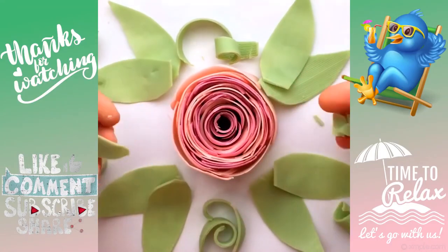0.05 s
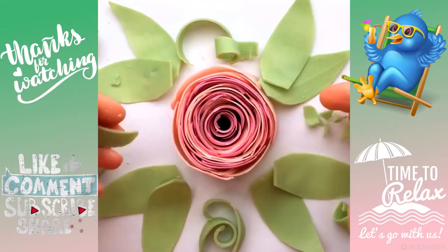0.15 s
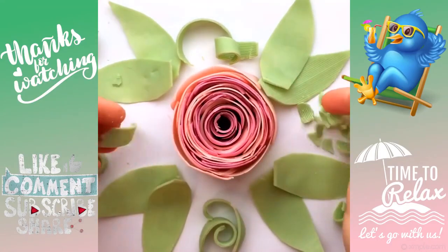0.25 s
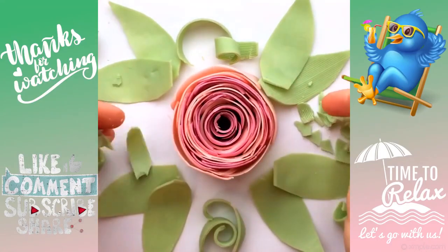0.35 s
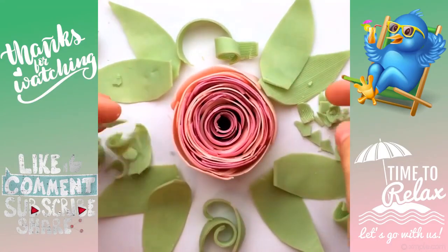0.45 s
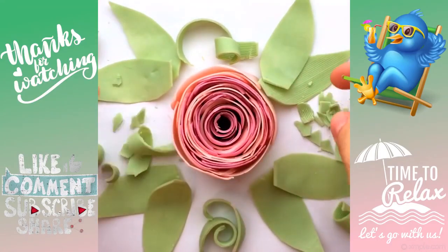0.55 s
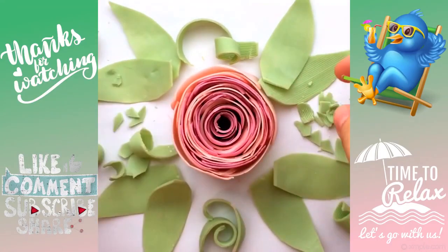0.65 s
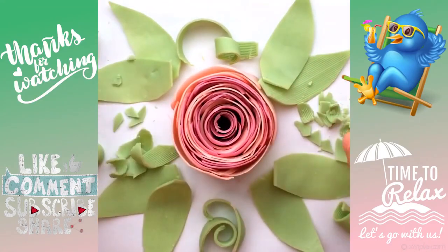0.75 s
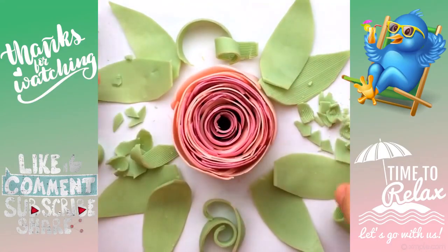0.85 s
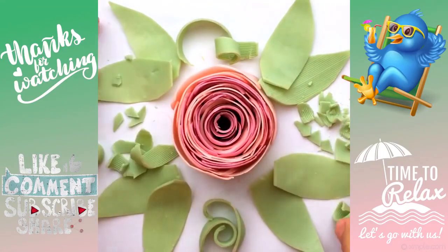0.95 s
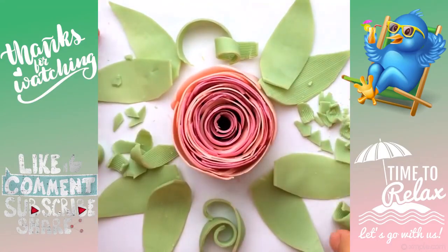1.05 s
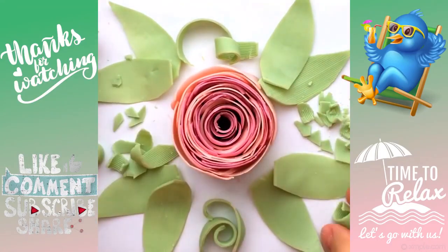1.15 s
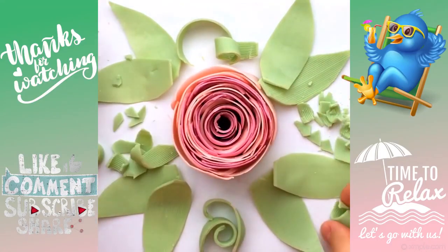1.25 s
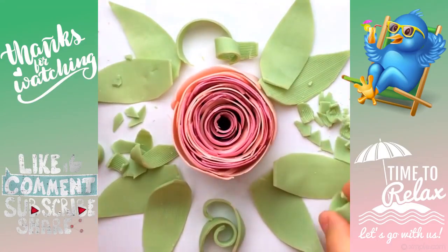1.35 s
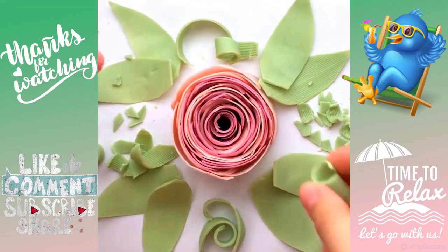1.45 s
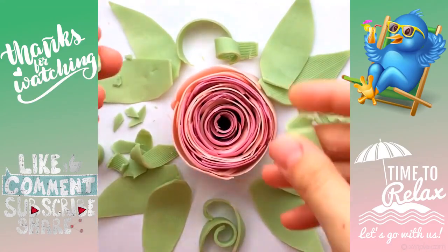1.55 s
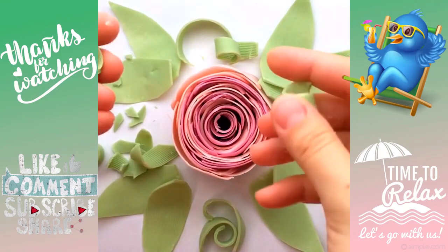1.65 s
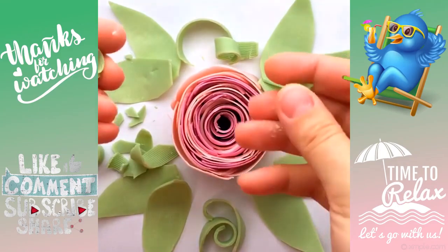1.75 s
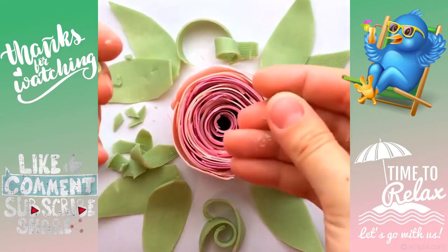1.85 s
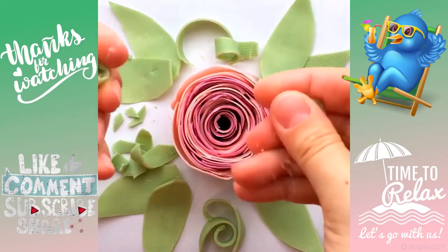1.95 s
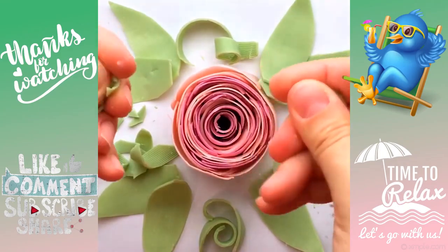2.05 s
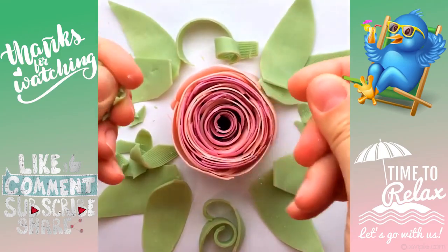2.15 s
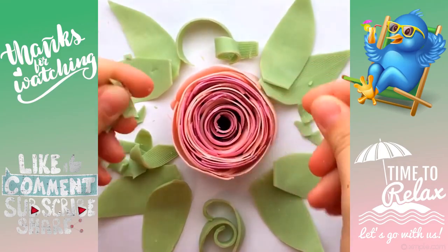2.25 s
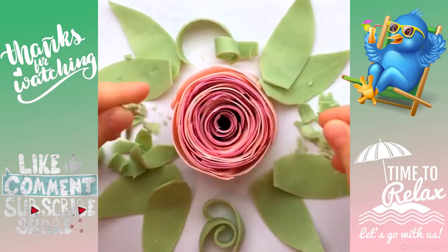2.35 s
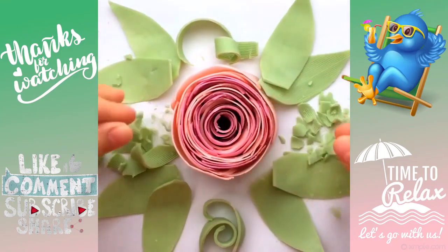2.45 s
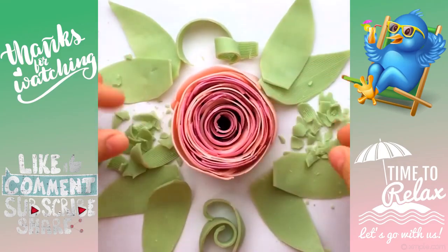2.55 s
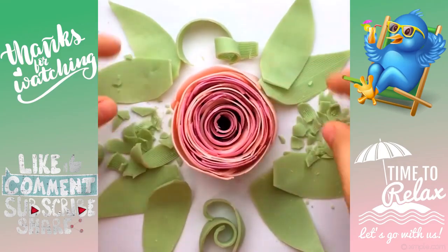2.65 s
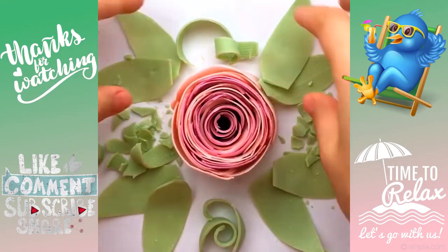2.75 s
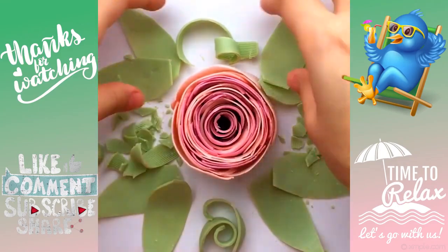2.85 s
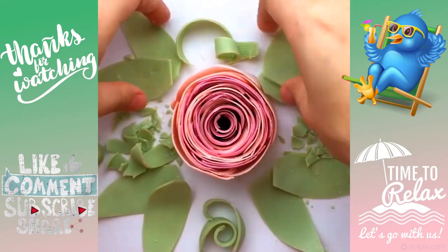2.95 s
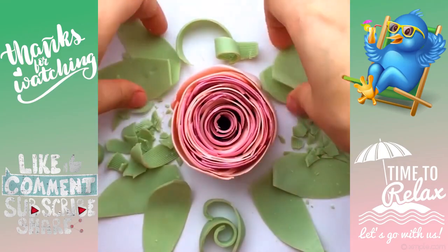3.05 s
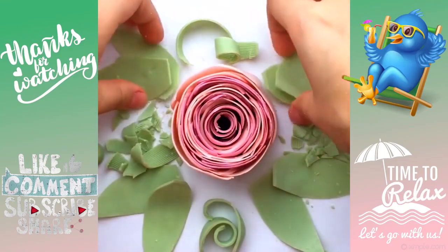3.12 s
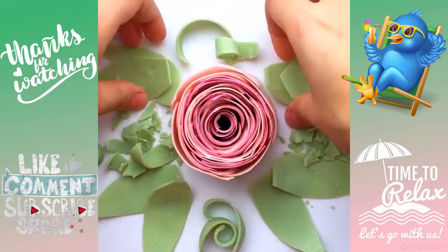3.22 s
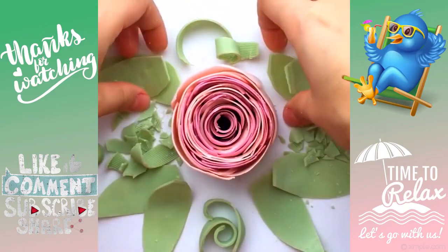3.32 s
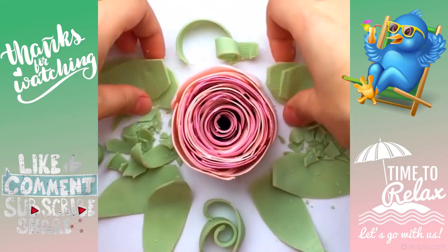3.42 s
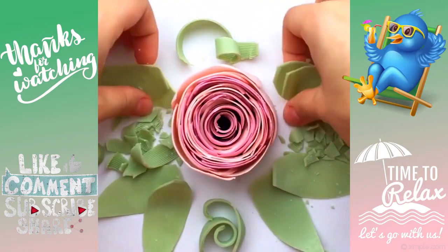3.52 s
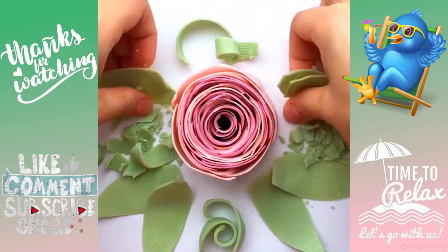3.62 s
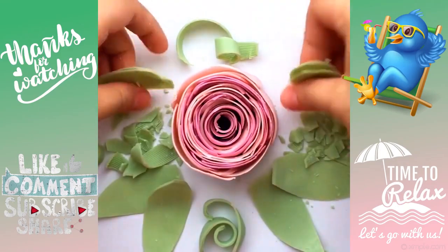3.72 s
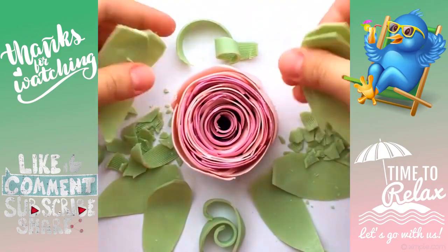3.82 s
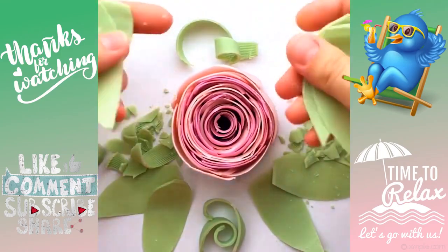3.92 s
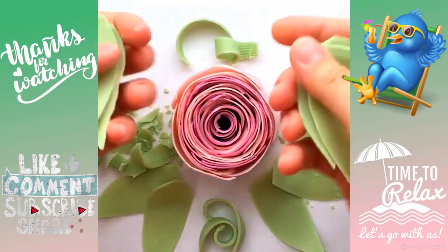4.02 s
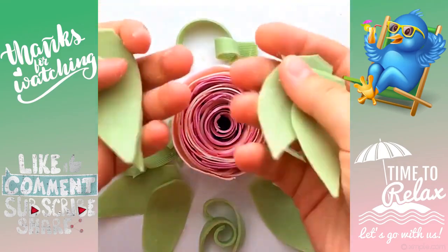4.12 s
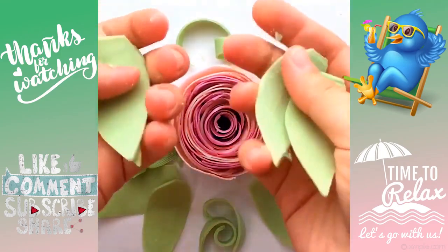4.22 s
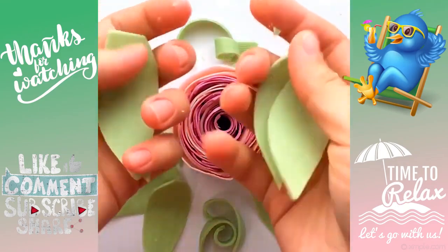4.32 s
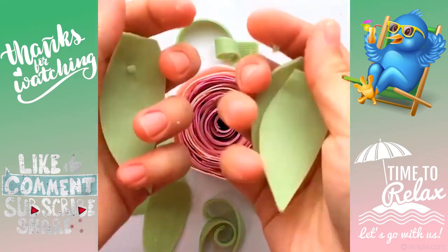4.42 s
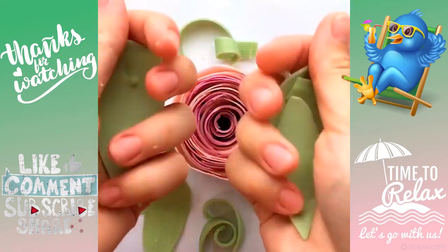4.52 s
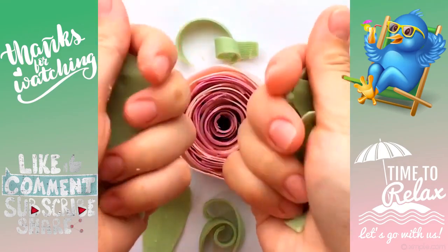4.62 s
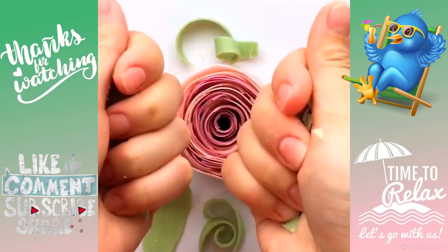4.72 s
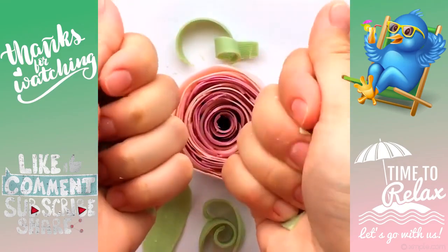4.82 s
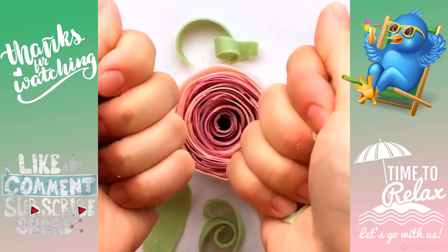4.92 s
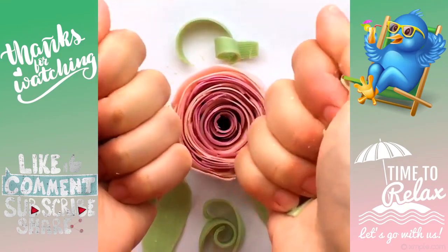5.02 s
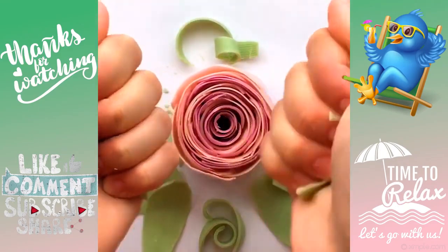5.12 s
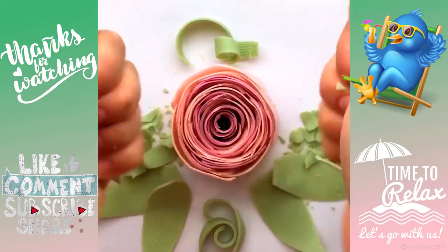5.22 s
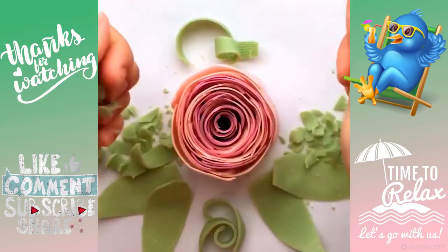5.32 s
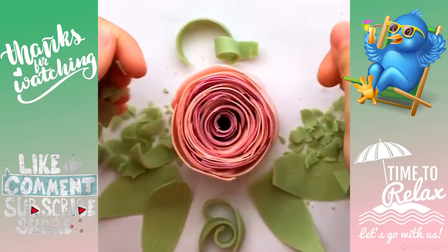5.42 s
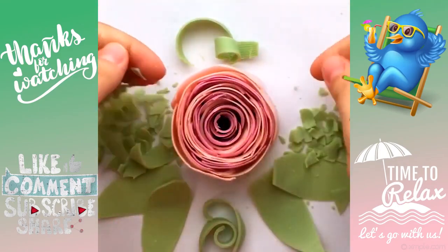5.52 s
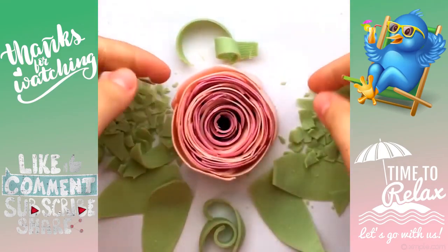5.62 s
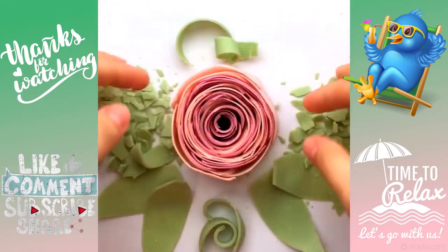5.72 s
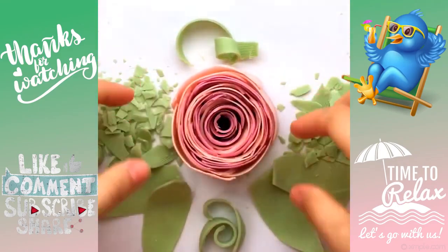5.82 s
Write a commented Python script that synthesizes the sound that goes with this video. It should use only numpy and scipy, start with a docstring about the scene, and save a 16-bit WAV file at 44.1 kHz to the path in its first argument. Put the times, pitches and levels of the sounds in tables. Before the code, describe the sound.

Close to the microphone in a small quiet room, dried clay leaves are broken by hand. Faint rustle and small ticks come first, crumbs tap onto a covered table, a sharp cluster of snaps follows near two seconds, pieces drop, soft thuds and sliding accompany gathering, then both fists crush leaves in a dense crunch before crumbs spill.

```python
"""A faint rustle and a few small cracks come first, then light taps: thin leaves of dried craft clay are
snapped and later crushed in two fists, close to a microphone in a small room.
Each fracture is a noise burst that rings its shard for a few milliseconds; dense ticks and noise make the crumbs
that grind and patter between. Pieces fall on a covered table, whose damped swings and faint modes answer them.
Gliding bands of friction noise, reflections, a low room tone and faint far tones complete the scene."""
import sys
import numpy as np
from scipy import signal
from scipy.fft import rfft, irfft, next_fast_len
from scipy.io import wavfile
from scipy.ndimage import map_coordinates

SR = 44100
rng = np.random.default_rng(int(sys.argv[2]) if len(sys.argv) > 2 else 0)


def persist_wave(psi):
    """Save psi, clipped to +-1, as 16-bit WAV."""
    counts = np.round(np.clip(psi, -1, 1) * 32767).astype(np.int16)
    wavfile.write(sys.argv[1], SR, np.atleast_2d(counts).T)


N = 258867

# Main fractures in the hands: start_s, level_db, decay_t60_s (2 ms at least), ring_hz, ring_boost_db,
# tilt_db_per_octave
CRACKS = [(.006, -44.5, 0.041, 2030, 23, -5.5), (.2411, -27, 0.019, 1200, -8, .5),
          (.2452, -31, 0.017, 10200, 13, -3), (.3198, -32.5, 0.008, 7500, 26, -2),
          (.3482, -30.5, .017, 7600, 15, 9), (2.0437, -16.5, 0.011, 9000, 7, 3),
          (2.0473, -15, 0.026, 2710, 13, 2.5), (2.058, -14.5, 0.022, 2750, 6, 3.5),
          (2.0639, -26.5, 0.0073, 5950, 20, -6.5), (2.1128, -35, 0.0073, 5300, 14, 0),
          (2.1654, -29, 0.005, 5100, 10, 1), (2.1783, -7.5, 0.0051, 4440, 7, 0.5),
          (2.1808, -9.5, 0.0066, 8600, 6, -1), (2.1886, -24, .025, 4800, 19, -6),
          (2.196, -25, .015, 11100, 10, -4), (2.2365, -19.5, 0.014, 10500, 15, -6),
          (2.2609, -33.5, 0.011, 4630, 20, -4.5), (2.293, -23.5, 0.014, 2310, 31, 11),
          (2.3101, -29.5, .007, 5900, 5.5, 2.5), (2.385, -32.5, .008, 10050, 27, 0),
          (4.1673, -44.5, 0.013, 7720, 11.5, -3), (4.2088, -46, .0085, 7400, 4, 5),
          (4.2924, -41, .015, 6750, 8, -1.5), (4.314, -30.5, .006, 3280, 19, 0),
          (4.3436, -38, 0.0054, 5370, 9, -6), (4.3518, -31, 0.0042, 3550, 17, 3.5),
          (4.3586, -31.5, 0.0062, 3390, 14, 3.5), (4.3667, -30, 0.008, 3300, 17, 2.5),
          (4.3891, -37, .02, 3220, 22, 3), (4.4774, -38, 0.097, 3240, 9, -4.5),
          (4.5928, -37, 0.0096, 5140, 23, -8.5), (4.68, -36.5, 0.013, 4660, 16, -8.5),
          (4.7047, -31, 0.0029, 3670, 22, -8), (4.7557, -14, 0.0062, 3700, 21, -3.5),
          (4.7605, -28, 0.017, 3240, 29, 4), (4.7649, -15, 0.0061, 3830, 29, -3),
          (4.772, -14, .01, 4140, 15, -5.5), (4.7881, -10.5, 0.0083, 3350, 25, -5.5),
          (4.8276, -17, 0.0026, 6110, 12, -3.5), (4.8316, -16.5, 0.0083, 4400, 13.5, -6.5),
          (4.8377, -23.5, 0.015, 6110, 6, -5.5), (4.8524, -14.5, 0.0017, 3700, 28, -10),
          (4.8575, -18, 0.032, 2230, 16, -8), (4.8694, -11, 0.0036, 3670, 12.5, -3.5),
          (4.8906, -14.5, .011, 3600, 29, -5.5), (4.9076, -22, .012, 4000, 8, 5),
          (4.9105, -9, 0.0076, 1750, 25, 1), (4.9152, -13, 0.026, 1930, 28, 0.5),
          (4.9194, -12, 0.01, 4540, 25, 3), (4.9238, -17.5, 0.016, 1720, 27, -1),
          (4.9345, -21, 0.011, 5900, 19, -4), (4.9375, -14, 0.021, 2470, 6, -2.5),
          (4.949, -26, 0.019, 1810, 6, -3.5), (4.9639, -35, .011, 3120, 24, -5),
          (4.976, -26.5, .032, 4500, 22, -8.5), (4.9812, -14, 0.0097, 4040, 19, 2),
          (4.9848, -19.5, .013, 2070, 19, -1), (5.0091, -25.5, 0.019, 1440, 13, -0.5),
          (5.0155, -19.5, 0.016, 1970, 12, 1.5), (5.0289, -23, 0.085, 1900, 10, -1),
          (5.0409, -19, 0.021, 1110, 22, 1), (5.0488, -23, 0.03, 1160, 26, 1.5),
          (5.0765, -17.5, .018, 2280, 17, -1.5), (5.0812, -18, 0.014, 1970, 2, -3),
          (5.0883, -11.5, 0.0091, 3850, 12.5, -1), (5.0974, -19.5, 0.0084, 1240, 13, -3),
          (5.1037, -28, 0.016, 5100, 12, -7), (5.1276, -26, .007, 7320, 21, -1.5),
          (5.1459, -20.5, 0.0082, 1280, 16, -2.5), (5.154, -25, .029, 1390, 19, -4),
          (5.1757, -28, .02, 1640, 31, -9), (5.1892, -20.5, 0.0086, 2190, 8, -2),
          (5.1928, -11.5, 0.007, 2050, 15.5, -2.5), (5.2014, -23.5, 0.024, 1600, 12, -2.5),
          (5.2111, -19.5, 0.0065, 11000, 21, -9.5), (5.2439, -25.5, .011, 2280, 17, 2.5),
          (5.2517, -27, 0.013, 1620, 26, -9), (5.2675, -21.5, 0.027, 2050, 28, -7.5),
          (5.2739, -26, 0.021, 2420, 26, 0), (5.3081, -22, 0.0085, 2170, 30, -3.5),
          (5.3443, -36.5, 0.011, 2480, 15, -3)]
# Main pieces striking the table: same columns as the fractures
TAPS = [(.368, -28, 0.014, 1870, 7.5, -3), (.4206, -31, 0.032, 1800, 1, -1.5),
        (.4355, -25, 0.0077, 1810, 10.5, -5.5), (.4694, -36, .017, 1260, 22, 4),
        (.5339, -34, 0.014, 2470, 2, -2), (.5656, -31, 0.013, 2240, 9, -6),
        (.5862, -30, 0.018, 5660, 13, -3.5), (.6662, -27, 0.0074, 2180, 10.5, -3.5),
        (.7287, -27, 0.0046, 11200, 22, 15), (.7414, -31, 0.05, 10800, 24, -7),
        (.7837, -37.5, 0.016, 11300, 21, -5.5), (.8558, -27.5, .012, 8700, 8.5, 5.5),
        (.8973, -27.5, 0.013, 1800, 5, 7.5), (.9286, -42, .009, 7000, 10, 4),
        (.9711, -34.5, 0.0037, 5400, 26, 7), (.9903, -38, .009, 6650, 8, 4.5),
        (1.0324, -27.5, .014, 11100, -4, 13), (1.0566, -29, 0.0099, 6900, 12.5, 8),
        (1.1291, -36.5, 0.0088, 7850, 11, 7), (2.5658, -31.5, 0.033, 9100, 4, 7),
        (2.6027, -26, 0.083, 3580, 30, 7), (2.6087, -22, 0.062, 10000, 21, 8),
        (2.6236, -24, 0.12, 1900, 13, 1.5), (2.6568, -25, 0.039, 6130, 27, -6),
        (2.6636, -26, 0.0096, 5300, 32, 1), (2.7029, -30.5, 0.055, 2320, 7, -6),
        (2.7781, -35, 0.0072, 9100, 8, 11), (2.8547, -41, .01, 11200, 17, 6),
        (2.9426, -30, 0.0048, 6300, 5, 8), (3.1491, -46.5, .014, 5060, 11, 2.5),
        (3.2176, -40, .01, 1200, 14, 2), (3.2359, -37.5, .01, 1870, 14.5, -3.5),
        (3.461, -44.5, 0.02, 2500, 10, -7), (3.4992, -38, 0.018, 3440, 7, 0),
        (3.6494, -36, .041, 1260, 10, 0.5), (3.9574, -46, .036, 4000, 24, 4.5),
        (5.561, -32, 0.033, 1720, 0, -3), (5.628, -32, 0.0048, 6170, 13, 5.5),
        (5.6577, -25.5, .017, 5430, 6.5, -5), (5.7709, -26, 0.038, 9300, 22, 0),
        (5.8034, -25, 0.021, 1190, 30.5, 7)]
# Dull blows on the table or into the palm: start_s, level_db, pitch_hz, decay_t60_s
THUMPS = [(.373, -22, 178, 0.029), (.44, -44, 197, .06), (0.516, -28.5, 182, 0.05), (0.568, -30, 199, 0.06),
          (0.689, -31.5, 195, 0.12), (1.422, -28.5, 141, .05), (1.453, -38, 69.4, 0.19),
          (2.179, -17.5, 296, 0.018), (2.238, -31.5, 424, 0.016), (2.624, -32, 193, 0.1),
          (3.2331, -12, 141, 0.049), (3.273, -23.5, 152, 0.083), (3.501, -27.5, 162, 0.098),
          (4.938, -20, 467, 0.016), (5.193, -21, 394, 0.01)]
# Colour of a fracture and of a landing: frequency_hz, gain_db
FRACTURE_COLOUR = [(60, -40), (250, -18.5), (520, -8.5), (800, -14.5), (1500, -6), (3000, -3), (9000, 2),
                   (14000, 0.5)]
LANDING_COLOUR = [(60, -10), (250, -7.5), (520, -9), (800, -12.5), (1500, -6), (3000, -2), (9000, -1),
                  (14000, -5.5)]
# Colour of coarse crumbs, fine dust, table rumble and room tone: frequency_hz, relative_gain_db
GRIT_COLOUR = [(100, -24), (350, 0.5), (600, 0), (850, 1), (1400, -1), (2000, 2.5), (2800, -4.5),
               (3600, -0.5), (5500, -17.5), (12000, -27.5)]
DUST_COLOUR = [(1000, -56), (3000, -30), (5000, -4), (7500, -3.5), (10000, -3.5), (13800, -3.5),
               (16000, -18)]
TABLE_COLOUR = [(25, -31), (60, -22.5), (110, -8.5), (145, -0.5), (175, 2.5), (215, -3.5), (320, -14.5),
                (500, -22.5), (650, -19), (900, -34.5), (3000, -48)]
ROOM_TONE_COLOUR = [(20, -20.5), (30, -12.5), (43, 4.5), (65, 3), (90, -6), (130, 3), (180, -1.5),
                    (260, -17.5), (450, -22.5), (1000, -28), (4000, -35), (14000, -41.5)]
# Reverberation of the room: frequency_hz, decay_t60_s
ROOM_DECAY = [(200, 0.36), (2000, 0.082), (12000, 0.062)]
# A leaf sliding over skin or table: centre_s, half_length_s, nominal_level_db, pitch_hz,
# glide_octaves_per_s, relative_bandwidth (ratio)
SLIDES = [(0.049, 0.19, -60, 2930, 0.51, 0.56), (1.306, 0.14, -66.5, 5410, 0.31, 0.091),
          (3.453, 0.34, -54.5, 7160, -0.037, 0.46), (3.6, 0.51, -64, 3605, -0.21, 0.19),
          (4.22, 0.11, -61.5, 7040, -1.1, 0.044), (4.39, 0.15, -58, 3300, -0.075, .16),
          (5.774, 0.21, -51, 4520, 0.066, 0.51)]
# Resonances of the table top: centre_hz, width_hz, gain_db
TABLE_MODES = [(162, 19, -11), (630, 14, 10), (1935, 47, -1), (2520, 40, 2)]
# Faint background tones: start_s, end_s, peak_db, pitch_hz
FAINT_TONES = [(0.782, 0.83, -59, 637), (0.876, 0.94, -66, 638), (1.038, 1.095, -65, 637)]

# Three kinds of crumb movement: start_s, hold_s, grit_db, dust_db, rumble_db (before the trims in crumbs())
# Their shapes: attack_s, sag_db_per_s, release_db_per_s
# The fingers press until the clay gives way
SQUEEZES = [(2.045, 0.015, -42, -54, -53), (2.18, 0.047, -48, -50, -61), (2.24, .04, -57, -71, -70),
            (4.335, 0.043, -51.5, -46.5, -58), (4.76, 0.039, -36, -69, -65), (4.835, .13, -40, -68, -66),
            (5.02, 0.061, -41.5, -57, -70), (5.08, 0.077, -38, -44, -65), (5.17, 0.12, -45, -76, -57.5)]
SQUEEZE_SHAPE = (0.011, 23, 390)
# A handful of crumbs pours onto the table
SPILLS = [(.375, 0.043, -48.5, -49.5, -47), (.425, 0.063, -42, -51, -42.5), (.572, 0.033, -50, -58, -42),
          (.668, 0.012, -39.5, -52, -36.5), (.742, 0.031, -47.5, -58, -43.5), (2.604, .11, -46, -42, -45.5),
          (5.656, .1, -44.5, -42.5, -46), (5.765, 0.057, -44.5, -39.5, -43), (5.84, .04, -41.5, -34, -39.5)]
SPILL_SHAPE = (0.016, 14, 235)
# The fingers gather, turn or dust off pieces
HANDLINGS = [(0, 0.16, -64, -62, -59.5), (.28, 0.044, -60, -55.5, -55.5), (.8, .01, -82, -68, -49.5),
             (.96, 0.03, -66, -54, -58.5), (1.17, 0.13, -72, -61.5, -51.5), (1.28, 0.019, -65, -56, -50.5),
             (1.425, 0.0086, -62, -61, -45), (2.1, 0.51, -58, -59, -56.5), (2.76, 0.023, -69, -62, -54.5),
             (3.16, 0.072, -62, -68, -48), (3.24, 0.085, -58, -65, -41), (3.4, 0.27, -60, -59, -44.5),
             (3.76, .19, -60, -61.5, -59.5), (4.08, 0.074, -69, -65.5, -72),
             (4.2, 0.084, -61.5, -65, -68.5), (4.46, .03, -59, -62.5, -65), (4.6, 0.072, -64, -78, -73),
             (5.31, .32, -56.5, -61, -59)]
HANDLING_SHAPE = (0.093, 5.3, 139)

# Small chips: density, level over the crumbs, spread of levels, then decay, ring and range of pitches
CHIPS_PER_S, CHIP_DB, CHIP_SPREAD_DB = 70, 3.5, 3
CHIP_T60_S, CHIP_BOOST_DB, CHIP_TILT_DB = 0.011, 9, 0
CHIP_LOW_HZ, CHIP_HIGH_HZ = 1400, 7500
# Time constant of a blow's onset, in cycles of its swing, and level of its noise against the swing
THUMP_RISE_CYCLES, THUMP_PUFF_DB = 0.5, -10.5


def clicks(rows, colour, sharpness, tail_db, tail_t60, lead_db, size=2560):
    """Impulsive excitation of a resonator: micro-crack noise rings a shard and is trailed by debris."""
    lead_s = .005
    out = np.zeros(N)
    hz = np.fft.rfftfreq(size, 1 / SR) + 1
    t = np.arange(size) / SR - lead_s
    before, after = np.minimum(t, 0), np.maximum(t, 0)
    for start, level_db, t60, ring_hz, boost_db, tilt_db in rows:
        main_decay = amp(-60 * after / max(t60, .002))
        debris = amp(tail_db - 60 * after / tail_t60)
        # hairline cracks build up just before the piece gives way
        hairlines = (t < 0) * amp(lead_db + 60 * before / 0.01)
        envelope = (main_decay + debris) * (1 - np.exp(-after / 0.00018)) + hairlines
        # the crack front advances in jerks
        jerks = amp(3.2 * wobble(1100, size=size))
        burst = rng.standard_normal(size) * envelope * jerks
        detuning = hz / ring_hz - ring_hz / hz
        shard = 1 + (amp(boost_db) - 1) / (1 + 1j * sharpness * detuning)
        # small free shards are bright; a closed fist dulls them
        slope_db = tilt_db * np.log2(np.maximum(hz, 1100) / 4000)
        body = causal(amp(along(colour, hz) + slope_db))
        # palm or table a few centimetres away throws back a copy
        bounce = 1 + .55 * np.exp(-2j * np.pi * hz * rng.uniform(.0004, .0015))
        click = irfft(rfft(burst) * shard * bounce * body)
        # level_db is the rms of the click's energy spread over 2 ms
        click = click / np.linalg.norm(click) * np.sqrt(.002 * SR)
        add(out, start - lead_s, amp(level_db) * click)
    return out


def chips(flow):
    """Random small fractures: chip levels follow the stronger of grit and dust at each moment."""
    when, size, pitch = rng.random((int(CHIPS_PER_S * N / SR), 3)).T
    moving_db = np.maximum(flow[0], flow[1])[(when * N).astype(int)]
    levels_db = moving_db + CHIP_DB + CHIP_SPREAD_DB * np.minimum(-np.log(1 - size), 2)
    rings_hz = CHIP_LOW_HZ * (CHIP_HIGH_HZ / CHIP_LOW_HZ) ** pitch
    starts_s = when * N / SR
    return [(start, db, CHIP_T60_S, hz, CHIP_BOOST_DB, CHIP_TILT_DB)
            for start, db, hz in zip(starts_s, levels_db, rings_hz)]


def thumps():
    """Damped oscillation: a soft blow gives one low, quickly decaying swing and a dull puff of noise."""
    out = np.zeros(N)
    t = np.arange(SR // 4) / SR
    puffs = coloured(rng.standard_normal(N), TABLE_COLOUR)
    for start, level_db, hz, t60 in THUMPS:
        puff = puffs[int(start * SR):][:len(t)]
        swing = np.sin(2 * np.pi * hz * t)
        rise = 1 - np.exp(-t * hz / THUMP_RISE_CYCLES)
        envelope = amp(level_db - 60 * t / t60) * rise
        add(out, start, envelope * (swing + amp(THUMP_PUFF_DB) * puff))
    return out


def table_ring(x):
    """Modal resonance: what lands on the table leaves its modes ringing faintly."""
    def response(hz):
        return sum(amp(db) * 1j * hz * width / (centre ** 2 - hz ** 2 + 1j * hz * width)
                   for centre, width, db in TABLE_MODES)
    return filtered(x, response)


def stirred(rows, shape):
    """Energy addition: grit, dust and rumble powers rise, sag while a movement lasts, then die away."""
    attack_s, sag_db_per_s, release_db_per_s = shape
    t, power = np.arange(N) / SR, np.zeros((3, N))
    for start, hold, *levels_db in rows:
        age = t - start
        sag_db = sag_db_per_s * np.clip(age, 0, hold)
        release_db = release_db_per_s * np.maximum(age - hold, 0)
        # the linear rise is half done at the start time
        envelope = np.clip(.5 + age / attack_s, 0, 1) * amp(-(sag_db + release_db))
        power += np.outer(amp(levels_db), envelope) ** 2
    return power


def crumb_flow(rest_db=(-82, -77, -72)):
    """Incoherent summation: all movements add in power over a faint settling of crumbs, in dB."""
    power = stirred(SQUEEZES, SQUEEZE_SHAPE)
    power += stirred(SPILLS, SPILL_SHAPE)
    power += stirred(HANDLINGS, HANDLING_SHAPE)
    return 10 * np.log10(power + amp(rest_db)[:, None] ** 2)


def grains(rate, spread_db, t60, ring, size=256):
    """Granular excitation: a dense patter of decaying ticks of varied size, with any ring at random pitches."""
    count, t = int(rate * N / SR), np.arange(size) / SR
    when, strength, pitch = rng.random((count, 3)).T
    sizes = amp(spread_db * np.minimum(-np.log(1 - strength), 4))
    ring_hz = 1700 + 12000 * pitch[:, None]
    tone = np.sin(2 * np.pi * ring_hz * t)
    noise = rng.standard_normal((count, size))
    ticks = sizes[:, None] * (noise + ring * tone) * amp(-60 * t / t60)
    index = (when * N).astype(int)[:, None] + np.arange(size)
    return unit(np.bincount(index.ravel(), ticks.ravel(), N + size)[:N])


def crumbs(flow):
    """Granular friction and impact: coarse grit and fine dust scatter over a rumbling table top."""
    grit_db, dust_db, rumble_db = flow
    patter = grains(rate=1200, spread_db=5.2, t60=.007, ring=1.6) + amp(-5) * rng.standard_normal(N)
    # crumbs give way in clumps
    patter = patter * amp(2.1 * wobble(70, size=N))
    grit = amp(grit_db - 3.5) * coloured(patter, GRIT_COLOUR)
    dust = amp(dust_db + 1.0) * coloured(patter, DUST_COLOUR)
    knocks = grains(rate=300, spread_db=2, t60=0.0037, ring=0)
    rumble = amp(rumble_db - 2.0) * coloured(knocks, TABLE_COLOUR)
    return grit + dust + rumble


def slides(rough_db=3.5):
    """Dry friction: noise sings in a band of the leaf, which glides as the grip shifts."""
    out, t = np.zeros(N), np.arange(N) / SR
    for centre, half, level_db, hz, glide, width in SLIDES:
        stroke = np.cos(np.pi / 2 * np.clip((t - centre) / half, -1, 1))
        phase = 2 * np.pi * np.cumsum(hz * 2 ** (glide * (t - centre))) / SR
        # low-pass noise multiplied by a sine becomes a band around its pitch
        friction = unit(filtered(rng.standard_normal(N), lambda f: 1 / (1 + (f / (width * hz)) ** 2)))
        roughness = amp(level_db + rough_db * wobble(100, size=N))
        out += roughness * stroke * friction * np.sin(phase)
    return out


def near_echoes(x, db, count=7):
    """Early reflection: weak delayed copies return from surfaces within a metre or two."""
    delays_s = rng.uniform(.002, .012, count)
    return amp(db) * filtered(x, lambda hz: np.exp(-2j * np.pi * hz * delays_s[:, None]).sum(0))


def room(x):
    """Diffuse reverberation: a decaying noise response answers, dying sooner in the treble."""
    hz, t, noise = signal.stft(rng.standard_normal(SR // 3), SR, nperseg=256)
    decay = amp(-60 * t / along(ROOM_DECAY, hz)[:, None])
    tail = signal.istft(noise * decay, SR, nperseg=256)[1]
    # the first 5 ms are left silent
    response = np.pad(tail, (SR // 200, 0)) / np.linalg.norm(tail)
    return signal.fftconvolve(x, response)[:N]


def room_tone():
    """Stationary background noise: random pressure with a steady, mostly low spectrum."""
    return amp(-55.5) * coloured(rng.standard_normal(N), ROOM_TONE_COLOUR)


def faint_tones():
    """Pure tone: a thin steady sine fades in and out far behind the crackle."""
    t, out = np.arange(N) / SR, np.zeros(N)
    for start, end, peak_db, hz in FAINT_TONES:
        gate = np.clip(np.minimum(t - start, end - t) / .015, 0, 1)
        out += amp(peak_db) * gate * np.sin(2 * np.pi * hz * t)
    return out


def amp(db):
    """Decibel law: amplitude ratio of a level in dB."""
    return 10 ** (np.asarray(db) / 20)


def unit(x):
    """Normalisation: x scaled to rms 1."""
    return x / np.sqrt(np.mean(x ** 2) + 1e-20)


def along(points, hz):
    """Logarithmic pitch scale: (Hz, value) points interpolated on a log axis."""
    f, v = np.transpose(points)
    return np.interp(np.log(hz + 1), np.log(f + 1), v)


def filtered(x, response):
    """Linear filtering: the spectrum of x times a response of frequency."""
    m = next_fast_len(N + 8192)
    return irfft(rfft(x, m) * response(np.fft.rfftfreq(m, 1 / SR)), m)[:N]


def coloured(x, spectrum):
    """Spectral shaping: x filtered by the given gains in dB, at rms 1."""
    return unit(filtered(x, lambda hz: amp(along(spectrum, hz))))


def causal(gain):
    """Minimum phase: the response with this gain, found by folding its cepstrum onto positive time."""
    cepstrum = irfft(np.log(np.maximum(gain, 1e-6)))
    cepstrum[1:len(cepstrum) // 2] *= 2
    cepstrum[len(cepstrum) // 2 + 1:] = 0
    return np.exp(rfft(cepstrum))


def add(track, s, sound):
    """Superposition: mix a sound into the track at time s."""
    i = max(0, round(s * SR))
    track[i:i + len(sound)] += sound[:max(0, N - i)]


def wobble(rate, size):
    """Slow random modulation: a smooth curve through random knots, rate of them a second."""
    knots = rng.standard_normal(int(size * rate / SR) + 4)
    return map_coordinates(knots, [np.arange(size) * rate / SR])


def scene():
    """Superposition of cracks, landings, crumbs and rubbing with reflections in a quiet room."""
    flow = crumb_flow()
    cracks = clicks(list(CRACKS) + chips(flow), FRACTURE_COLOUR, sharpness=5.3,
                    tail_db=-18.5, tail_t60=0.021, lead_db=-24.5)
    taps = clicks(TAPS, LANDING_COLOUR, sharpness=5.9, tail_db=-26, tail_t60=0.033, lead_db=-28)
    clay = cracks + taps + thumps() + table_ring(taps) + crumbs(flow) + slides()
    reflections = near_echoes(clay, db=-22.5) + amp(-21) * room(clay)
    return (clay + reflections + room_tone() + faint_tones())[None]


def record(dry):
    """Saturation and band limiting: tall peaks are rounded, deep bass and the top treble removed."""
    limited = dry[0] / (1 + np.abs(dry[0] / .8) ** 4) ** (1 / 4)

    def response(hz):
        bass_cut = hz ** 4 / (hz ** 4 + 29 ** 4)
        treble_cut = 1 / np.sqrt(1 + (hz / 14000) ** 130)
        return bass_cut * treble_cut
    return filtered(limited, response)[None]


dry = scene()
out = record(dry)
persist_wave(out)
```